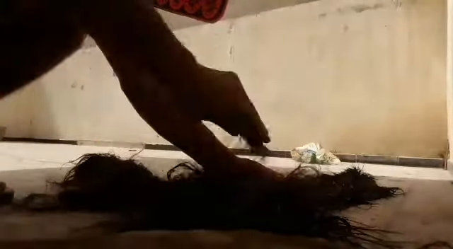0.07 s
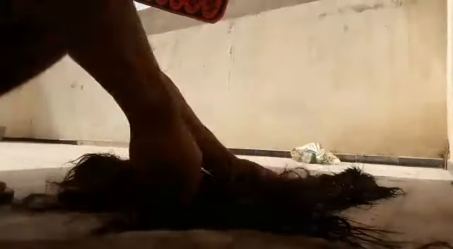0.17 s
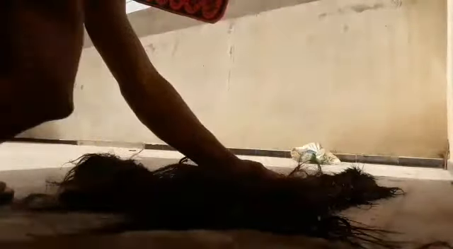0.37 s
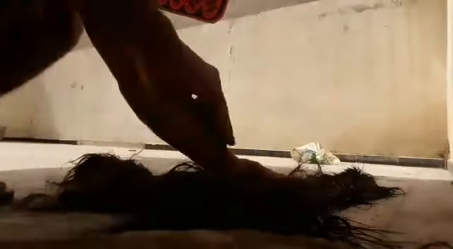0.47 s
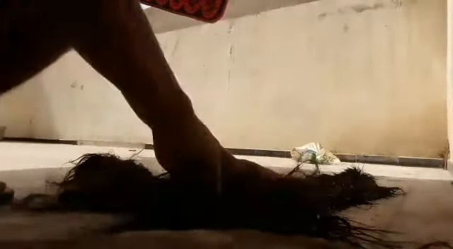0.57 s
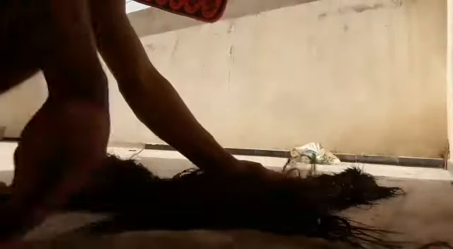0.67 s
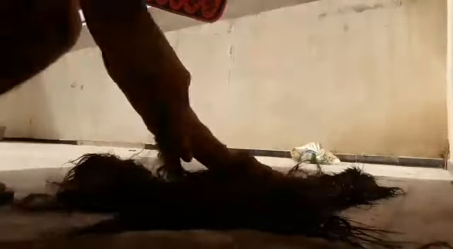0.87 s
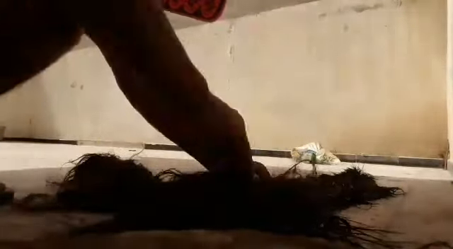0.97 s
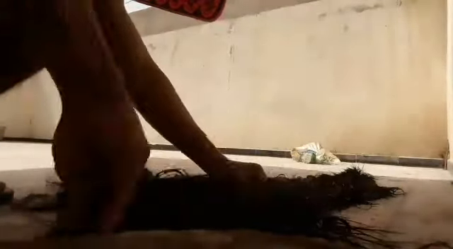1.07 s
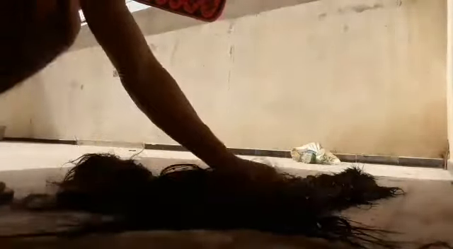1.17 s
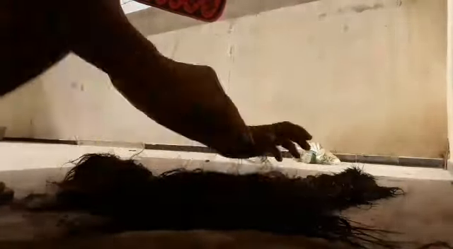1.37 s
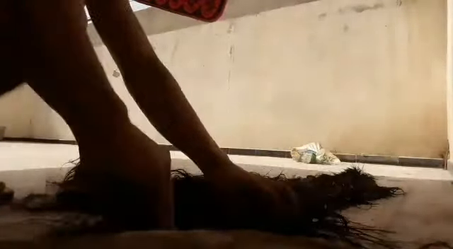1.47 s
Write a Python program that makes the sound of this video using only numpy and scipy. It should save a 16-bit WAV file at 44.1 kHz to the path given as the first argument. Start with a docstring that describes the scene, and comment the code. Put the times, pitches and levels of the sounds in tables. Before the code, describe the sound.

Three short, rough scrapes drag through tangled hair on an animal hide, each starting with a soft thud and growing brighter. A small tick follows the first. Low hum and faint hiss fill the slightly echoing room.

```python
"""A hand tool rasps three times through the matted hair of a hide on the floor of a bare room.
Hairs slip past the edge as dense clicks that brighten through each pull; tufts snap, the skin flutters.
Each stroke lands with a soft thud, and a small tick follows the first.
The room rings briefly over a low hum, rumble and faint hiss."""
import sys
import numpy as np
from scipy import signal
from scipy.fft import rfft, irfft
from scipy.io import wavfile

SR = 44100
rng = np.random.default_rng(int(sys.argv[2]) if len(sys.argv) > 2 else 0)


def master(y):
    """Save y as 16-bit WAV."""
    cut = np.clip(np.atleast_2d(y).T, -1, 1)
    pcm = np.round(cut * 32767)  # scale
    wavfile.write(sys.argv[1], SR, pcm.astype(np.int16))


N = 66150

# Pull force, one list per stroke: (time [s], level [dB])
PULL_FORCE = [
    [(0.195,-38.5), (0.222,-33.5), (0.23,-25.5), (0.247,-19.5), (0.257,-23.5), (0.268,-19.5), (0.29,-24),
     (0.302,-29.5), (0.345,-51)],
    [(0.63,-72), (0.634,-35.5), (0.654,-27), (0.664,-29.5), (0.695,-21.5), (0.712,-22), (0.735,-26),
     (0.749,-23.5), (0.756,-40.5), (0.765,-39.5)],
    [(1.056,-46.5), (1.082,-31.5), (1.114,-23), (1.138,-22.5), (1.16,-27), (1.177,-23), (1.198,-49)],
]
# Strokes: (middle [s], flutter [dB], flutter peak [s], treble [dB], hollow tone [dB], edge tone [dB],
# floor press [dB])
STROKE_SETTINGS = [(0.27, 3, 0.28, 1, -17, -15, -3), (0.699, -1.5, 0.693, 3, -4, -3, -7),
                   (1.129, -6, 1.138, 5, -3.5, -1.5, 5)]
# Rasp spectrum: (frequency [Hz], relative level [dB])
RASP_SPECTRUM = [(120, -18), (420, -17.5), (750, -16), (1030, -13.5), (1200, 1), (1500, -3.5), (2000, -9.5),
                 (2450, -3), (3000, -5), (3500, -10.5), (4400, -18.5), (5500, -29.5), (6600, -38.5),
                 (8000, -49.5), (11000, -39.5), (15500, -37)]
# Tool and hide resonances: (frequency [Hz], width [Hz], lift [dB])
BODY_PEAKS = [(543.8, 76, 10.5), (863.5, 107, 8.5), (1126, 82, 3.5), (1332, 22, -0.5), (1444, 30, 4.5),
              (1677, 50, 5.5), (1776, 77, 8), (2785, 87, 4), (3037, 50, -4), (3164, 40, 7)]
def hair_rasp():
    """Hairs slip past the edge as hard as the pull, exciting a hollow tone and a rising edge tone."""
    treble_hz, brighten_db_per_s = 3140, 133
    edge_hz, rise_hz_per_s, fade_db_per_s = 2973, 2300, 63
    t, hair = np.arange(N) / SR, np.zeros(N)
    clicks = slips()
    dull = signal.sosfiltfilt(signal.butter(5, treble_hz, fs=SR, output="sos"), clicks)
    hollow = resonate(clicks, hz=1360, width_hz=150)
    for pull, (middle_s, _, _, treble_db, hollow_db, edge_db, _) in zip(PULL_FORCE, STROKE_SETTINGS):
        force = from_db(np.interp(t, *np.transpose(pull), left=-120, right=-120))
        offset_s = np.clip(t - middle_s, -.05, .035)
        treble = from_db(treble_db + brighten_db_per_s * offset_s) * (clicks - dull)
        edge = resonate(clicks, edge_hz + rise_hz_per_s * offset_s, width_hz=200)
        edge *= from_db(edge_db - fade_db_per_s * offset_s)
        hair += force * (dull + treble + from_db(hollow_db) * hollow + edge)
    return from_db(-4) * through(hair, response(RASP_SPECTRUM, BODY_PEAKS))


def slips(rate_per_s=5000, spread_db=2, judder_db=0.68):
    """Dense tiny clicks of uneven size, their level shaken by the judder of the edge."""
    sizes = from_db(spread_db * np.minimum(rng.exponential(1, N), 4)) * rng.choice([-1, 1], N)
    slipping = rng.random(N) < rate_per_s / SR
    judder = from_db(judder_db * drift(rate_hz=108))
    return rms_one(sizes * slipping * judder)


# Dragged skin spectrum: (frequency [Hz], relative level [dB])
SKIN_SPECTRUM = [(60, -32), (150, -8), (300, 1), (420, -5), (560, 1), (850, -2), (1200, -17), (2500, -19),
                 (8000, -90)]
def skin_drag(width_s=0.019):
    """In mid-stroke the dragged skin flutters and the press on the floor adds a low rumble."""
    t, flutter_gain, press_gain = np.arange(N) / SR, np.zeros(N), np.zeros(N)
    for _, flutter_db, peak_s, _, _, _, press_db in STROKE_SETTINGS:
        drag = np.exp(-np.abs(t - peak_s) / width_s)
        flutter_gain += from_db(flutter_db) * drag
        press_gain += from_db(press_db) * drag
    flutter = through(flutter_gain * slips(), response(SKIN_SPECTRUM, BODY_PEAKS))
    press = press_gain * rms_one(resonate(slips(), hz=147, width_hz=90))
    return from_db(-32.5) * flutter + from_db(-39.5) * press


# Tufts letting go: (time [s], snap [dB], tearing [dB])
TUFTS = [(0.2267, -28, -36), (0.2465, -13.5, -31.5), (0.2707, -14, -28.5), (0.2853, -6.5, -27),
         (0.3057, -14.5, -36.5), (0.6532, -22, -34), (0.6805, -22, -37), (0.6909, -24, -33),
         (0.7071, -20, -35), (0.743, -15, -32.5), (1.078, -36, -37), (1.1003, -18, -35),
         (1.1106, -17.5, -37.5), (1.1293, -12, -40), (1.1683, -23, -41)]
def tuft_snaps(tear_decay_s=0.0041, lowpass_hz=6500):
    """A caught tuft lets go with one snap and a few milliseconds of tearing."""
    t, snaps, tearing = np.arange(N) / SR, np.zeros(N), np.zeros(N)
    for at_s, snap_db, tear_db in TUFTS:
        snaps[int(at_s * SR)] += from_db(snap_db)
        tearing += from_db(tear_db) * (t > at_s) * np.exp(-np.abs(t - at_s) / tear_decay_s)
    lowpass = signal.butter(1, lowpass_hz, fs=SR, output="sos")
    body = signal.sosfilt(lowpass, response(RASP_SPECTRUM, BODY_PEAKS))
    return through(snaps + tearing * rng.choice([-1, 1], N), body / np.abs(body).max())


# Tool landings: (time [s], level [dB])
TOOL_HITS = [(0.197, -24.5), (0.6345, -18.5), (1.0585, -29.5)]
# Modes of the tool on the padded floor: (frequency [Hz], level [dB], t60 [s])
THUD_MODES = [(189, -7.5, 0.058), (283, -5.5, 0.025), (575, -8, 0.031), (833, -13.5, 0.022),
              (1250, -8.5, 0.012), (2740, -11, 0.021)]
def tool_thuds(lowpass_hz=4030):
    """Each landing rings the tool's damped modes, softened by the hair."""
    thuds = np.zeros(N)
    for at_s, hit_db in TOOL_HITS:
        age_s = np.maximum(np.arange(N) / SR - at_s, 0)
        thuds += from_db(hit_db) * ring(THUD_MODES, age_s)
    return signal.sosfilt(signal.butter(4, lowpass_hz, fs=SR, output="sos"), thuds)


# Crack and rattle spectra: (frequency [Hz], relative level [dB])
CRACK_SPECTRUM = [(500, -25), (2200, 2.5), (3200, -4), (3900, 6), (5200, -13), (8000, -28), (10000, -21),
                  (15500, -22)]
RATTLE_SPECTRUM = [(500, -18), (2300, -4), (3200, -8), (4200, 5), (4950, -16), (5700, -20), (8000, -33),
                   (15500, -30)]
def tick(at_s=0.378, crack_decay_s=0.0015, rattle_decay_s=0.0077):
    """A small hard crack with a brief rattle."""
    age_s = np.arange(N) / SR - at_s
    grit = (age_s > 0) * rng.choice([-1, 1], N)
    crack = from_db(-32) * np.exp(-np.abs(age_s) / crack_decay_s) * grit
    rattle = from_db(-44) * np.exp(-np.abs(age_s) / rattle_decay_s) * grit
    return through(crack, response(CRACK_SPECTRUM)) + through(rattle, response(RATTLE_SPECTRUM))


# Wall reflection spectrum: (frequency [Hz], relative level [dB])
WALL_SPECTRUM = [(100, -4), (500, 4), (1300, -4), (3000, -8.5), (6000, -7), (14000, -4.5)]
# Room resonances: (frequency [Hz], level [dB], t60 [s])
ROOM_TONES = [(547, -88, 0.79), (1081, -63, 0.65)]
def room(x, delay_s=0.0027, t60_s=0.49):
    """Bare walls return a diffuse, slightly dull ring with two lingering tones."""
    t = np.arange(N) / SR
    tail = rng.standard_normal(N) * (t > delay_s) * np.exp(-np.log(1000) * t / t60_s)
    reflected = through(x, response(WALL_SPECTRUM))
    diffuse = through(reflected, tail / np.linalg.norm(tail))
    return from_db(-18.5) * diffuse + through(x, ring(ROOM_TONES, t))


# Background noise spectrum: (frequency [Hz], relative level [dB])
NOISE_SPECTRUM = [(20,-49), (38,-25), (52,-16.5), (110,-8), (160,-5.5), (190,-16), (290,-19), (400,-26.5),
                  (540,-24), (700,-30), (1250,-31.5), (1700,-34.5), (2000,-39), (2900,-40.5), (4200,-48),
                  (5800,-59), (7800,-64), (11000,-56), (15500,-53)]
# Hum partials: (frequency [Hz], level [dB])
HUM_PARTIALS = [(63, -49.5), (126, -53.5)]
def background(split_hz=490, swell_db=2.5, waver_db=1.5):
    """Slowly swelling low rumble and faint hiss, with a wavering hum."""
    t, hum = np.arange(N) / SR, np.zeros(N)
    noise = signal.fftconvolve(rng.standard_normal(2 * N), response(NOISE_SPECTRUM))[N:2 * N]
    rumble = signal.sosfiltfilt(signal.butter(2, split_hz, fs=SR, output="sos"), noise)
    hiss = noise - rumble
    for hz, db in HUM_PARTIALS:
        amplitude = np.sqrt(2) * from_db(db + waver_db * drift(rate_hz=2.3))
        hum += amplitude * np.sin(2 * np.pi * (hz * t + rng.random()))
    swell = from_db(swell_db * drift(rate_hz=3.3))
    return from_db(-44) * (hiss + swell * rumble) + hum


def from_db(db):
    """Decibels to gain."""
    return 10 ** (np.asarray(db) / 20)


def rms_one(x):
    """Scale to unit rms."""
    return x / np.sqrt(np.mean(x ** 2) + 1e-20)


def drift(rate_hz):
    """Smooth random wander of unit rms."""
    pole = np.exp(-2 * np.pi * rate_hz / SR)
    return rms_one(signal.lfilter([1], [1, -2 * pole, pole * pole], rng.standard_normal(2 * N))[N:])


def response(spectrum, peaks=(), size=8192):
    """Minimum-phase impulse response of unit energy, from a spectrum plus resonances."""
    hz = np.maximum(np.fft.rfftfreq(size, 1 / SR), 1)
    points_hz, points_db = np.transpose(spectrum)
    db = np.interp(np.log(hz), np.log(points_hz), points_db)
    for centre_hz, width_hz, lift_db in peaks:
        db += lift_db / (1 + (2 * (hz - centre_hz) / width_hz) ** 2)
    cepstrum = irfft(np.log(from_db(db)))
    cepstrum[size // 2:] = 0
    impulse = irfft(np.exp(2 * rfft(cepstrum)))[:size // 2]
    return impulse / np.linalg.norm(impulse)


def through(x, impulse):
    """Pass a sound through an impulse response."""
    return signal.fftconvolve(x, impulse)[:N]


def ring(modes, age_s):
    """Sum of damped sines."""
    return sum(from_db(db) * np.exp(-np.log(1000) * age_s / t60_s) * np.sin(2 * np.pi * hz * age_s)
               for hz, db, t60_s in modes)


def resonate(x, hz, width_hz):
    """Unit-gain resonance whose centre may glide."""
    carrier = np.exp(2j * np.pi * np.cumsum(hz + np.zeros(N)) / SR)
    pole = np.exp(-np.pi * width_hz / SR)
    return 2 * np.real(carrier * signal.lfilter([1 - pole], [1, -pole], x / carrier))


def scene():
    """Three strokes and a tick in the room, over the background."""
    direct = hair_rasp() + skin_drag() + tuft_snaps() + tool_thuds() + tick()
    return (direct + room(direct) + background())[None]


def record(dry):
    """The microphone drops the deep bass; the top is cut steeply."""
    low_cut_hz, high_cut_hz = 51.6, 15800
    thin = signal.sosfilt(signal.butter(6, low_cut_hz, "high", fs=SR, output="sos"), dry)
    return signal.sosfilt(signal.ellip(10, .1, 70, high_cut_hz, fs=SR, output="sos"), thin)


dry = scene()
out = record(dry)
master(out)
```